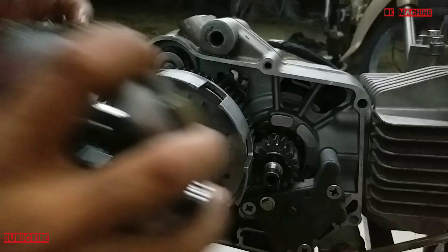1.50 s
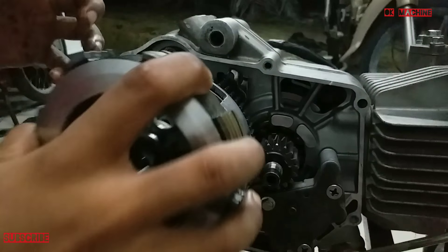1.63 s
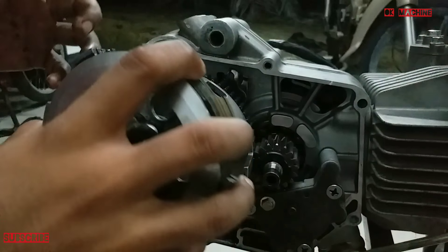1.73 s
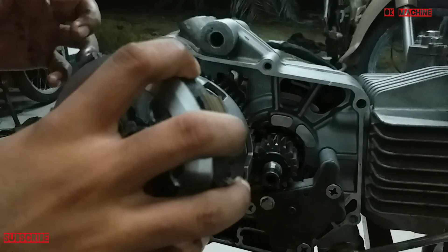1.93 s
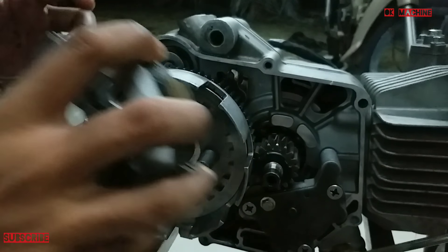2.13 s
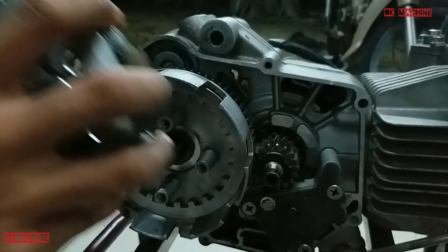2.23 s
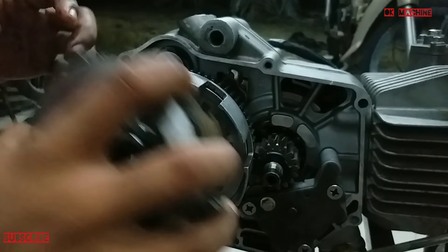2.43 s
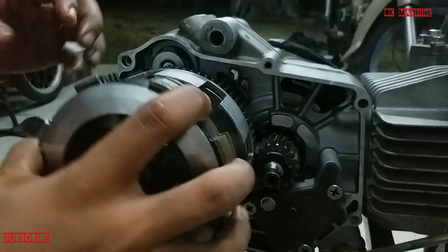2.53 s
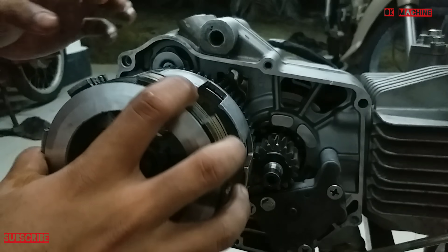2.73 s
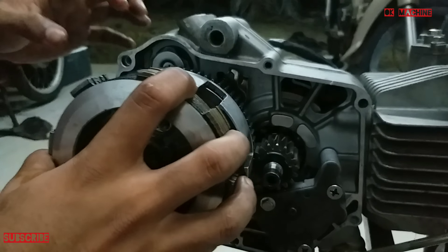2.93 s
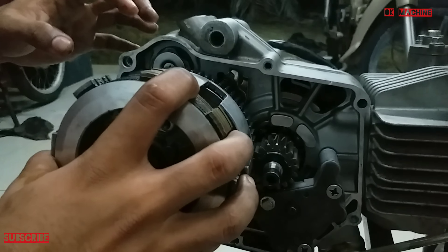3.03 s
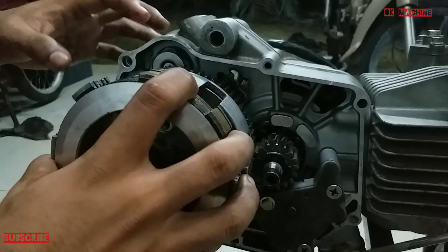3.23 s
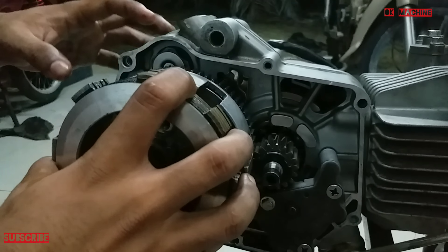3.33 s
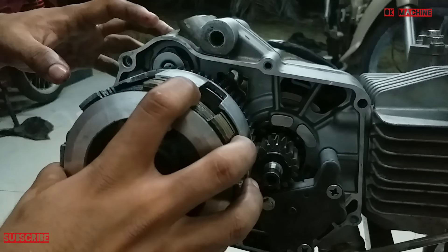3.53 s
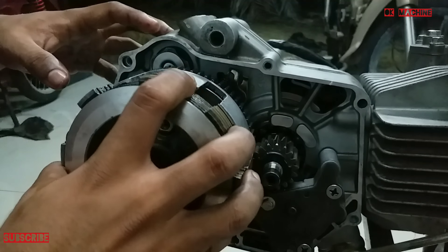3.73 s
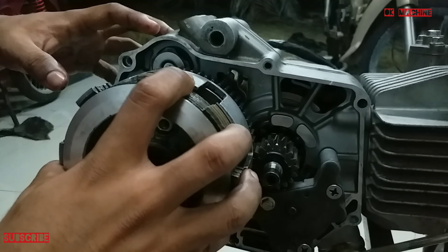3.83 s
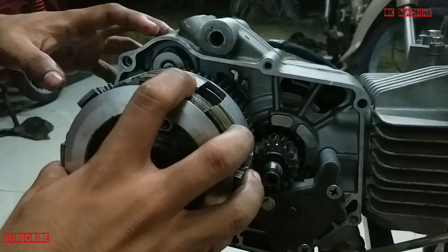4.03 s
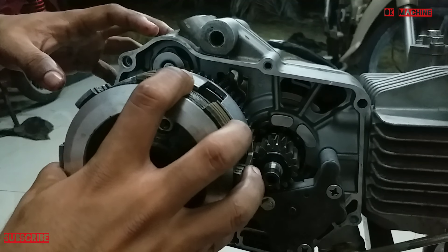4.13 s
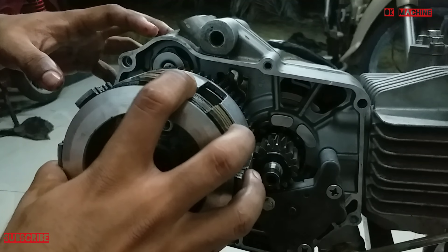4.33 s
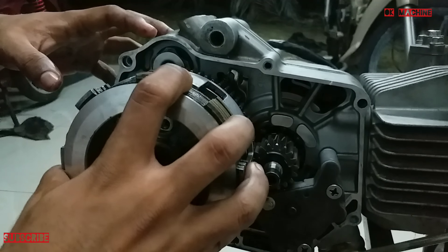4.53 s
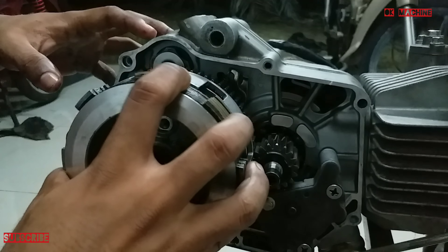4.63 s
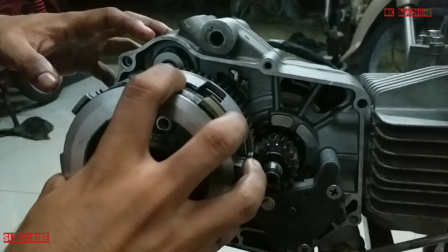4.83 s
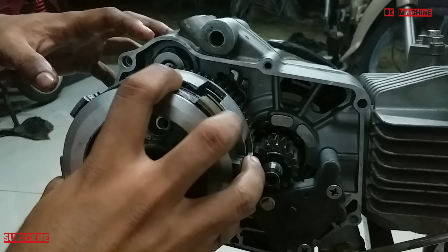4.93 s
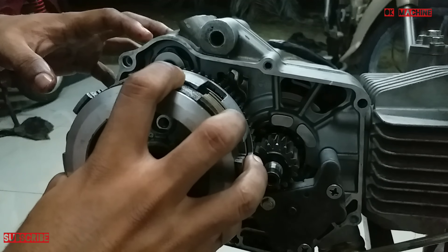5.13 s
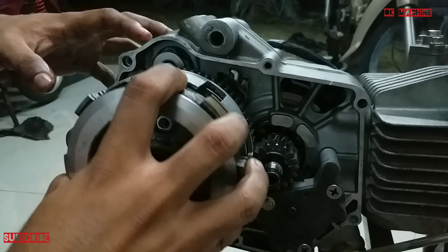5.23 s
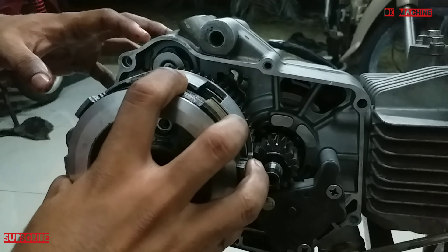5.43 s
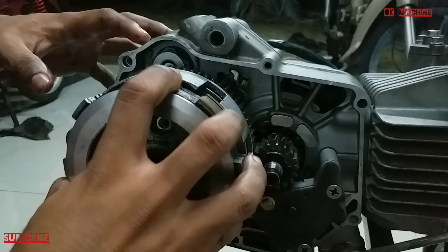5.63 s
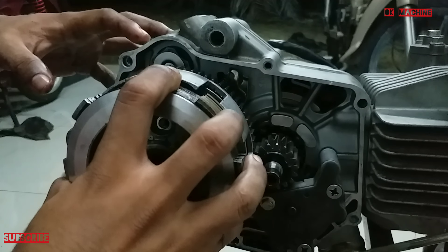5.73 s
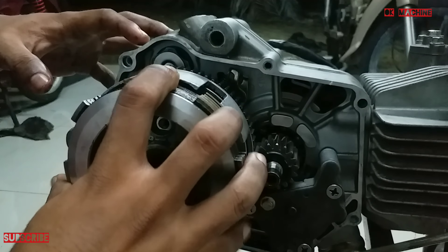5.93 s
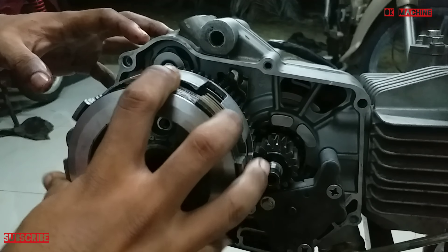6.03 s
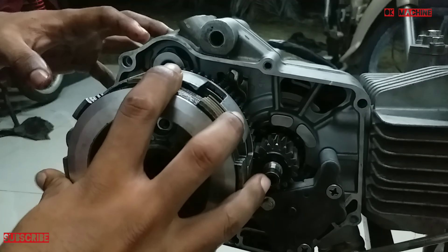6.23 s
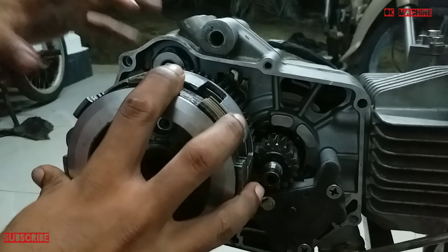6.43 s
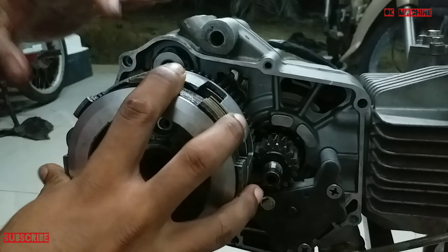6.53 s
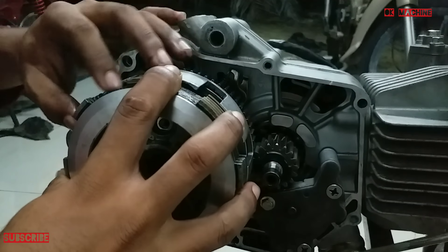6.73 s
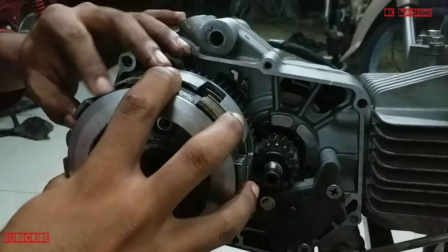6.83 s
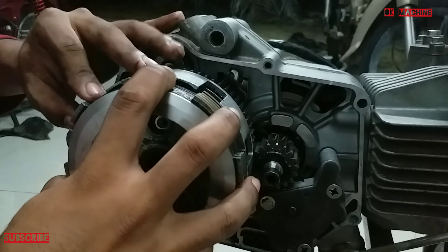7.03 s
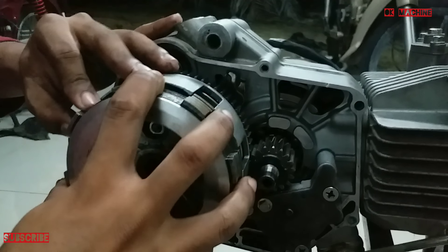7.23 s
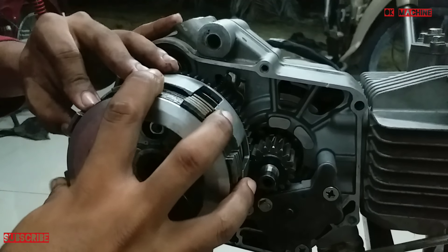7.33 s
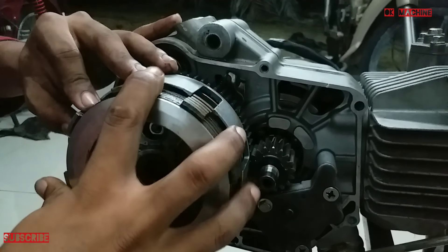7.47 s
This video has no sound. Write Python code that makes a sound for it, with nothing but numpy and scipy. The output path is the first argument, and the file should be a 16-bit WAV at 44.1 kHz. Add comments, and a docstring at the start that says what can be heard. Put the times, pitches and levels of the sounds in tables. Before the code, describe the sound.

Close-up metal handling in a garage: two sharp clicks, a burst of heavy ringing knocks, then quiet rubbing, spline scrapes and small steel ticks

```python
"""Steel snaps twice, a heavy plate pack clunks on an engine case, then splines scrape and tick.
A motorcycle clutch drum is being worked onto its shaft by hand, close to the microphone, in a garage.
Impacts excite damped modes of case and parts; friction is shaped noise, or one high mode that sings.
Behind them are night crickets, hiss, a faint hum and a low rumble. A noise suppressor turns
everything down when the midrange falls quiet."""
import sys
import numpy as np
from scipy import signal
from scipy.fft import rfft, irfft
from scipy.io import wavfile
from scipy.ndimage import uniform_filter1d

SR = 44100
rng = np.random.default_rng(int(sys.argv[2]) if len(sys.argv) > 2 else 0)


def to_wav(sig):
    """Store sig (one row per channel, or 1-D mono) as 16-bit WAV at the path in sys.argv[1].

    Samples outside -1..1 are clipped; the rate is SR.
    """
    pcm = np.clip(np.atleast_2d(sig), -1, 1) * 32767
    pcm = np.round(pcm).astype(np.int16)
    wavfile.write(sys.argv[1], SR, pcm.T)  # frames by channels


N = 432180
T = np.arange(2 ** 14) / SR  # time axis of one short sound, s
HZ = np.fft.rfftfreq(len(T), 1 / SR)  # its frequency axis


def amp(db):
    """Level to amplitude: 20 dB is a factor of ten."""
    return 10 ** (np.asarray(db) / 20)


def unit(x):
    """Normalization to an rms of 1."""
    return x / np.sqrt(np.mean(x ** 2) + 1e-20)


def read(points, hz):
    """Interpolation of a spectrum on a logarithmic frequency axis."""
    point_hz, value = np.transpose(points)
    return np.interp(np.log(hz + 1), np.log(point_hz + 1), value)


def curve(rows):
    """Linear interpolation of (time, value) rows over the whole scene."""
    return np.interp(np.arange(N) / SR, *np.transpose(rows))


def add(mix, start_s, sound):
    """Superposition: sums a sound into the mix from its start time."""
    part = mix[round(start_s * SR):][:len(sound)]
    part += sound[:len(part)]


def hump(hz, centre_hz, octaves):
    """Gaussian resonance curve on the log-frequency axis, 1 at its centre."""
    return np.exp(-.5 * (np.log2((hz + 1) / centre_hz) / octaves) ** 2)


def noise(colour, size):
    """Spectral shaping: white noise weighted by a colour, at rms 1."""
    spectrum = rfft(rng.standard_normal(size))
    return unit(irfft(spectrum * amp(read(colour, np.fft.rfftfreq(size, 1 / SR))), size))


def drift(rate_hz, size):
    """Random modulation: low-passed noise of rms 1."""
    f = np.fft.rfftfreq(size, 1 / SR)
    return unit(irfft(rfft(rng.standard_normal(size)) / (1 + (f / rate_hz) ** 4), size))


def causal(x, gain_db):
    """Minimum-phase filtering: colours a blow while its attack stays sharp."""
    log_gain = np.log(amp(np.r_[gain_db, gain_db[-2:0:-1]]))
    response = np.exp(np.conj(signal.hilbert(log_gain)))[:len(HZ)]
    return irfft(rfft(x) * response)


def by_attack(x, size=160):
    """Normalization of a blow to rms 1 over its first milliseconds."""
    return x / np.sqrt(np.mean(x[:size] ** 2))


def dense_modes():
    """Modal density: close, uneven spectral peaks stand for the many modes of one metal part."""
    return amp(4 * drift(900, size=len(HZ)))


def contact(pattern, echo_s, echo, chatter_s, chatter_db, ring_t60, ring_db):
    """Impulse excitation: one impact, its case reflection, a short chatter and a dense modal ring."""
    ring = unit(irfft(rfft(rng.standard_normal(len(T))) * pattern))
    chatter = rng.standard_normal(len(T)) * amp(chatter_db) * np.exp(-T / chatter_s)
    x = chatter + ring * amp(ring_db - 60 * T / ring_t60)
    x[0] += 1
    x[round(echo_s * SR)] += echo
    return x


def patchy(x, depth_db):
    """Moving contact: the rubbing spot shifts, so narrow resonances come and go."""
    z = signal.stft(x, SR, nperseg=2048, noverlap=1536)[2]
    field = uniform_filter1d(rng.standard_normal(z.shape), size=5, axis=0)  # smooth in frequency
    field = uniform_filter1d(field, size=8, axis=1)  # smooth in time
    return signal.istft(z * amp(depth_db * unit(field)), SR, nperseg=2048, noverlap=1536)[1][:N]


def far(x, size=600):
    """Multipath interference: distant sound arrives by a few paths, which combs its spectrum."""
    paths = rng.standard_normal(size) * (rng.random(size) < .02)
    paths = .4 * paths / (np.linalg.norm(paths) + 1e-9)
    paths[0] = 1  # direct sound
    return signal.oaconvolve(x, paths / np.linalg.norm(paths))[:N]


# cricket choruses: pitch_hz, width_octaves, relative level_db, chirps_per_s, time of one chirp_s,
# chirp depth_db either way
CRICKET_CHORUSES = [(7014, 0.036, -3.5, 7.89, 4.285, 5.5), (6056, 0.086, -1, 2.7, 4.67, 1.5),
                    (2957, 0.053, -5.5, 31, 1.5, 3)]


def crickets():
    """Amplitude modulation: each far chorus is a narrow band throbbing at its own chirp rate."""
    t, hz, out = np.arange(N) / SR, np.fft.rfftfreq(N, 1 / SR), np.zeros(N)
    for pitch_hz, octaves, db, rate_hz, chirp_s, depth_db in CRICKET_CHORUSES:
        band = unit(irfft(rfft(rng.standard_normal(N)) * hump(hz, pitch_hz, octaves), N))
        throb = unit(amp(depth_db * np.cos(2 * np.pi * rate_hz * (t - chirp_s))))
        out += amp(db) * band * throb
    return out


# partials of the hum: mean pitch_hz, mean level_db over the background
HUM_PARTIALS = [(205, -1.5), (312, -6)]


def hum():
    """Frequency and amplitude modulation: faint partials that waver in pitch and level."""
    out = np.zeros(N)
    for hz, db in HUM_PARTIALS:
        level = amp(db + 1.8 * drift(0.95, size=N))
        turns = np.cumsum(hz + 5 * drift(25, size=N)) / SR
        out += level * np.sin(2 * np.pi * turns)
    return out


# slow base levels of the background: time_s, hiss_crickets_and_hum_db, rumble_db
BACKGROUND_LEVELS = [(0, -53.5, -55.5), (.5, -54.5, -55.5), (.95, -60, -59.5), (1.5, -57, -56.5),
                     (1.75, -55.5, -54.5), (2.7, -55.5, -55.5), (3.4, -54, -52), (4.3, -54, -53.5),
                     (4.9, -54, -55), (9.8, -55, -55.5)]
# spectrum of the hiss: frequency_hz, relative level_db
HISS_SPECTRUM = [(1500, -19), (2300, -13), (2950, 0.5), (3400, -6.5), (3950, -24.5), (4700, -1),
                 (5300, -1.5), (6000, -4), (6900, -1.5), (7600, -6), (8800, -18.5), (10200, -0.5),
                 (11700, 2), (15500, -26)]
# spectrum of the rumble: frequency_hz, relative level_db
RUMBLE_SPECTRUM = [(25, -30), (50, -5), (75, 9), (210, 1.5), (320, -7), (480, -7.5), (1000, -16),
                   (2000, -58.5), (5000, -70)]


def background(hiss_db=3.0, rumble_db=4, flicker_db=1.52):
    """Incoherent sum: crickets, hiss, hum and low rumble, flickering slightly together."""
    high_db, low_db = (curve(np.array(BACKGROUND_LEVELS)[:, [0, column]]) for column in (1, 2))
    outside = far(amp(hiss_db) * noise(HISS_SPECTRUM, size=N) + crickets())
    rumble = amp(rumble_db) * noise(RUMBLE_SPECTRUM, size=N)
    flicker = amp(flicker_db * drift(30, size=N))
    return flicker * (amp(high_db) * (outside + hum()) + amp(low_db) * rumble)


# decay of the garage by band: frequency_hz, t60_s
GARAGE_T60 = [(150, 0.21), (500, 0.19), (1500, 0.33), (4000, .24), (12000, 0.076)]


def garage(x, size=22050):
    """Reverberation: sparse reflections of random sign, each band decaying at its own rate."""
    signs, arrives = rng.choice([-1., 1.], size), rng.random(size) < 3000 / SR  # 3000 per second
    taps = signs * arrives * (np.arange(size) > .006 * SR)  # none in the first 6 ms
    hz, t, z = signal.stft(taps, SR, nperseg=256)
    tail = signal.istft(z * amp(-60 * t / read(GARAGE_T60, hz)[:, None]), SR)[1]
    return signal.fftconvolve(x, tail / np.linalg.norm(tail))[:N]


# pushes or turns of the drum on its shaft: start_s, length_s, starting level_db
DRUM_PUSHES = [(0.0, 0.14, -50), (0.156, 0.44, -54.5), (.57, .53, -58), (1.168, 0.24, -59.5),
               (1.445, 0.074, -60), (1.612, 0.73, -51.5), (2.364, 0.23, -59), (2.673, 0.049, -59.5),
               (2.837, 0.3, -56), (3.228, 0.2, -55.5), (3.468, 0.23, -57), (3.744, .15, -58.5),
               (3.977, 0.505, -56.5), (4.509, 0.154, -58.5), (4.776, 0.31, -62.5), (5.049, 0.15, -55.5),
               (5.215, 0.38, -57), (5.639, 0.29, -57), (6.01, .11, -58), (6.164, 0.43, -55.5),
               (6.676, .13, -56.5), (7.157, 0.22, -51), (7.453, 0.19, -56.5), (7.763, 0.37, -53),
               (8.175, 0.22, -54), (8.498, 0.23, -59), (8.849, .18, -53), (9.068, 0.074, -54),
               (9.204, .19, -57), (9.668, 0.17, -58.5)]
# spectrum of the rub: frequency_hz, relative level_db
RUB_SPECTRUM = [(100, -21.5), (330, 9.5), (550, -1), (1300, -2), (2100, -19), (4000, -16.5), (9000, -18.5)]


def rubbing(grain_db=1.5, sag_db=-3, attack_s=0.011, release_s=0.0078):
    """Sliding friction: grainy noise follows each push, which starts firmly, eases off and stops."""
    effort, t = np.zeros(N), np.arange(SR) / SR
    for start_s, length_s, db in DRUM_PUSHES:
        shape = np.minimum(t / attack_s, 1) * np.exp(-np.maximum(t - length_s, 0) / release_s)
        level_db = db + sag_db * np.minimum(t / length_s, 1)
        add(effort, start_s, amp(level_db) * shape)
    rub = patchy(noise(RUB_SPECTRUM, size=N), depth_db=4.2)
    return effort * amp(grain_db * drift(45, size=N)) * rub


# thin, high swishes: start_s, band level_db, length_s
FRICTION_SWISHES = [(0.72, -54, 0.093), (0.901, -54, 0.12), (1.132, -48, 0.22), (7.806, -46.5, 0.11),
                    (7.99, -43.5, .18), (8.239, -43.5, .17)]


def swishes(centre_hz=5350, octaves=0.11):
    """Band-limited friction: narrow noise swells and fades along half a sine."""
    out = np.zeros(N)
    for start_s, db, length_s in FRICTION_SWISHES:
        band = unit(irfft(rfft(rng.standard_normal(len(T))) * hump(HZ, centre_hz, octaves)))
        swell = np.sin(np.pi * np.minimum(T / length_s, 1))
        add(out, start_s, amp(db) * band * swell)
    return out


# dull bumps as the hand leans on the drum, and the drum's low ring after some knocks: start_s, relative
# level_db, pitch_hz, fade_s
DULL_BUMPS = [(0.55, -34, 119, 0.0093), (2.842, -49, 345, 0.045), (3.467, -44.5, 344, 0.054),
              (7.783, -43, 175.4, .02), (8.232, -43.5, 330, 0.04), (8.234, -46.5, 167, 0.045)]


def bumps():
    """Damped oscillation: a dull push, or the drum after a knock, hums for a few cycles."""
    out = np.zeros(N)
    for start_s, db, hz, fade_s in DULL_BUMPS:
        add(out, start_s, amp(db) * 2 * np.exp(-T / fade_s) * np.sin(2 * np.pi * hz * T))
    return out


# singing of rubbed steel: start_s, mean pitch_hz, typical level_db, swell_s, fade_s
STEEL_SQUEAKS = [(.33, 9420, -17.5, 0.0047, 0.0056), (.379, 9400, -29.5, .004, 0.014),
                 (.845, 9450, -51, 0.0046, 0.014), (1.59, 9470, -35, 0.088, 0.027),
                 (1.725, 9400, -27.5, 0.0033, 0.018), (3.464, 5360, -29, 0.0012, 0.0043),
                 (3.464, 8340, -42, .002, 0.015), (3.833, 5453, -29.5, 0.0025, 0.017),
                 (3.833, 3720, -52, .003, 0.027), (3.833, 8285, -52, 0.0034, .02),
                 (4.02, 1950, -51.5, 0.011, 0.013), (5.143, 8670, -43.5, 0.0073, 0.023),
                 (4.518, 1680, -62.5, 0.028, .03), (5.518, 1640, -59.5, 0.029, .033),
                 (7.014, 5450, -39.5, 0.0015, 0.0096), (7.173, 5500, -39, 0.0017, 0.0071),
                 (9.778, 5620, -40, 0.0046, .05), (9.778, 8500, -48, .004, .05)]


def squeaks(wander=.004, flutter_db=2):
    """Self-excited vibration: sliding contact feeds one high mode, which swells unsteadily and dies."""
    out = np.zeros(N)
    for start_s, hz, db, swell_s, fade_s in STEEL_SQUEAKS:
        turns = np.cumsum(hz * (1 + wander * drift(120, size=len(T)))) / SR
        shape = np.minimum(T / swell_s, 1) * np.exp(-np.maximum(T - swell_s, 0) / fade_s)
        level = amp(db + flutter_db * drift(70, size=len(T)))
        add(out, start_s, level * shape * np.sqrt(2) * np.sin(2 * np.pi * turns))
    return out


# spline strokes as the drum is rocked: start_s, noise level_db before the stroke shape, length_s
SPLINE_SCRAPES = [(0.168, -31.5, 0.049), (0.836, -49, 0.061), (5.721, -46, 0.083), (5.982, -50.5, 0.071),
                  (6.232, -46, 0.054), (6.453, -49, 0.07), (6.654, -48.5, 0.14), (6.867, -47.5, 0.092),
                  (7.064, -45.5, 0.08), (7.26, -44.5, .072), (7.475, -47.5, 0.079), (7.67, -47.5, 0.09),
                  (7.858, -39.5, 0.042), (8.029, -46.5, 0.047), (8.207, -39, .042), (8.864, -46, 0.047),
                  (8.936, -46.5, 0.033), (9.557, -45.5, 0.031)]


def scrapes(grain_db=3, focus_db=22, octaves=0.99, modes_db=2,
            usual_hz=2800, usual_db=-47, octaves_per_db=.035):
    """Stick-slip: a quick run of tiny slips drives the drum's close modes; firmer strokes sound lower."""
    out, modes = np.zeros(N), modes_db * drift(400, size=len(HZ))
    for start_s, db, length_s in SPLINE_SCRAPES:
        u = T / length_s
        hz = usual_hz * 2 ** (octaves_per_db * (usual_db - db))
        stroke = (1 - np.exp(-10 * u)) * np.exp(-u ** 2 * 2)
        slips = rng.standard_normal(len(T)) * amp(grain_db * drift(440, size=len(T)))
        colour_db = modes + focus_db * hump(HZ, hz, octaves) - 6 * np.log2(1 + HZ / 5000)
        add(out, start_s, amp(db) * stroke * unit(causal(slips, colour_db)))
    return out


# clicking steel edges: start_s, attack level_db, main resonance_hz, bass weight_db
EDGE_CLICKS = [(0.3218, -16.5, 8100, -32), (0.322, -17.5, 4450, 14), (0.3285, -19, 3950, 12),
               (0.336, -17.5, 4300, -26), (0.3797, -11.5, 4670, 4), (0.3853, -15.5, 4260, -1),
               (0.393, -25, 3870, 5), (0.3997, -27, 3970, 2), (0.4074, -32, 3880, -5),
               (0.779, -46, 3930, -4), (1.011, -42, 776, 60), (1.727, -31, 6500, 0),
               (2.84, -32.5, 5200, 14), (3.4667, -26, 2640, 0), (3.834, -35, 5320, -13),
               (3.847, -44, 5450, 1), (3.874, -47.5, 5450, 3), (5.2438, -41, 3100, -4),
               (5.286, -45, 3100, 6), (7.015, -38, 5540, -14), (7.174, -34, 6800, -57),
               (7.7813, -32.5, 770, 24), (7.8084, -34, 860, 41), (8.201, -30.5, 3260, 15),
               (8.232, -27.5, 1020, 26.5), (8.5745, -44.5, 3200, -5), (8.6647, -40.5, 3100, 22),
               (8.753, -41.5, 3000, 13), (8.763, -35, 3140, 4.5), (8.7715, -40, 3000, 11),
               (8.8526, -29, 3210, -13), (9.121, -36.5, 3160, -14), (9.177, -38.5, 3040, -7),
               (9.2586, -38, 5300, 20), (9.373, -42.5, 4600, -17.5), (9.3829, -37, 2960, 2),
               (9.5566, -34.5, 4530, -4), (9.7342, -30, 3050, -16), (9.7386, -25.5, 3140, -17),
               (9.7451, -38, 3500, 12), (9.779, -33.5, 5600, 9)]
# spectrum of a click: frequency_hz, relative level_db
CLICK_SPECTRUM = [(30, -53), (100, -27), (300, -15), (900, -7), (2400, 4), (4500, 2), (7000, -0.5),
                  (9000, -12.5), (12000, -17), (15500, -32.5)]


def clicks(focus_db=8, octaves=0.19, bass_hz=1200, slide_db=-9, slide_s=0.0061):
    """Light impact of steel on steel: a brief slide, then a hard tick favouring one resonance."""
    out, pattern = np.zeros(N), dense_modes()
    for start_s, db, hz, weight_db in EDGE_CLICKS:
        skid_db = 0.31 * max(-5 - db, 0)  # a light touch skids where a hard one cracks
        hit = contact(pattern ** .5, echo_s=0.001189, echo=0.22, chatter_s=0.0019,
                      chatter_db=skid_db - 18.5, ring_t60=0.095, ring_db=skid_db - 35)
        focus = focus_db * hump(HZ, hz, octaves)
        colour_db = read(CLICK_SPECTRUM, HZ) + focus + weight_db / (1 + (HZ / bass_hz) ** 2)
        add(out, start_s, amp(db) * by_attack(causal(hit, colour_db)))
        slide = unit(causal(rng.standard_normal(len(T)), colour_db)) * np.exp(-T / slide_s)
        slide = slide[:SR // 20][::-1]  # reversed: it grows for 50 ms up to the tick
        slide_level = amp(min(db + slide_db, -40))  # sliding stays quiet however hard the stop
        add(out, start_s - len(slide) / SR, slide_level * slide)
    return out


# knocks of the plate pack on the case: start_s, level_db of the attack, brightness_db
PLATE_CLUNKS = [(1.5837, -25, 2), (1.6, -31.5, -26), (1.6446, -21.5, -8), (1.667, -36.5, 27),
                (1.6842, -24.5, -6), (1.773, -6, 5), (1.779, -25, -17), (1.864, -13.5, -4.5),
                (1.922, -26.5, -32), (1.9336, -25, 6), (1.9391, -13, -0.5), (1.945, -19, 3),
                (1.953, -18.5, -14), (2.0213, -13.5, -5), (2.065, -32, 6), (2.077, -17, -2),
                (2.088, -22, -13), (2.096, -21, -1.5), (2.1281, -26.5, -5), (2.141, -26, -25),
                (2.169, -30.5, -7), (2.219, -48, -4), (2.265, -42, -3), (2.838, -43, 25), (3.468, -34.5, 0),
                (3.5704, -42.5, 0), (4.009, -51, 4), (4.42, -50.5, -4), (7.223, -42.5, 24),
                (7.781, -51, -24), (8.2305, -35, -10)]
# spectrum of a clunk: frequency_hz, relative level_db
CLUNK_SPECTRUM = [(25, -75), (60, -40.5), (115, -25), (165, -3), (215, -1.5), (310, 7), (460, 2.5),
                  (700, -11), (1050, -2.5), (1350, 1.5), (2000, -4.5), (3300, -11), (5000, -19.5),
                  (9000, -24), (15500, -54)]
# modes of case and plates: frequency_hz, relative level_db, t60_s
RINGING_MODES = [(308.3, -2, 0.17), (454, -2, 0.16), (505, -10.5, 0.39), (650, -11, .16),
                 (1036, 4.5, 0.044), (1165, -8.5, 0.11), (1329, -5, 0.2), (1604, -16.5, 0.51),
                 (1682, -21.5, 0.06), (2120, -20.5, 0.083), (2880, -22.5, .16), (3320, -8.5, 0.072)]


def clunks(modes_db=-8, treble_hz=2500):
    """Modal excitation: plates chatter and the case rings, each blow striking another spot."""
    out, pattern = np.zeros(N), dense_modes()
    hz, mode_db, t60 = np.transpose(RINGING_MODES)[:, :, None]
    for start_s, db, bright_db in PLATE_CLUNKS:
        hit = contact(pattern, echo_s=.0012, echo=.5, chatter_s=.0032, chatter_db=-17,
                      ring_t60=.11, ring_db=-25)
        shelf_db = bright_db * HZ ** 2 / (HZ ** 2 + treble_hz ** 2)
        hit = by_attack(causal(hit, read(CLUNK_SPECTRUM, HZ) + shelf_db))
        # the spot struck sets the strength and sign of each mode
        share = rng.uniform(0.4, 1, hz.shape) * rng.choice([-1, 1], hz.shape)
        ring = (share * amp(mode_db - 60 * T / t60) * np.sin(2 * np.pi * hz * T)).sum(0)
        add(out, start_s, amp(db) * (hit + amp(modes_db) * ring))
    # high-pass: removes the deep bass that suddenly started damped sines bring
    return signal.sosfilt(signal.butter(2, 80, "high", fs=SR, output="sos"), out)


def scene(side_db=-13):
    """Superposition: centred sources; the treble of sharp clicks and squeaks is phase shifted oppositely in the
    two channels."""
    heavy = clunks() + bumps()
    sharp = clicks() + squeaks()
    light = sharp + patchy(scrapes(), depth_db=2.5) + swishes()
    reverberation = garage(amp(-12) * heavy + amp(-13) * light)
    mid = heavy + light + reverberation + rubbing() + background()
    treble = signal.sosfiltfilt(signal.butter(2, 6000, "high", fs=SR, output="sos"), sharp)
    side = amp(side_db) * signal.hilbert(treble).imag
    return np.array([mid + side, mid - side])


def suppress(x, listen_hz=(700, 2200), listen_s=0.018, threshold_db=-63.5, shut_db_per_s=241,
             deepest_db=-14):
    """Downward expansion: opens at once for midrange sound and sinks steadily in the pauses."""
    listen = signal.butter(4, listen_hz, "band", fs=SR, output="sos")
    band = signal.sosfiltfilt(listen, x.mean(0))
    level_db = 10 * np.log10(abs(uniform_filter1d(band ** 2, round(listen_s * SR))) + 1e-14)
    gain_db = -20 * np.log10(1 + amp(threshold_db - level_db) ** 2)  # halves the sound at threshold
    open_db = np.maximum(gain_db, deepest_db)
    fall = np.arange(N) / SR * shut_db_per_s
    return x * amp(np.maximum.accumulate(open_db + fall) - fall)  # limits the speed of closing


def record(dry, edge_hz=15850):
    """Soft saturation of the hardest knocks, then noise suppression and a band limit."""
    dry = dry / (1 + (dry / .95) ** 6) ** (1 / 6)
    low_pass = signal.firwin(511, edge_hz, window=("kaiser", 9), fs=SR)
    return signal.oaconvolve(suppress(dry), low_pass[None], "same", axes=1)


dry = scene()
out = record(dry)
to_wav(out)
```